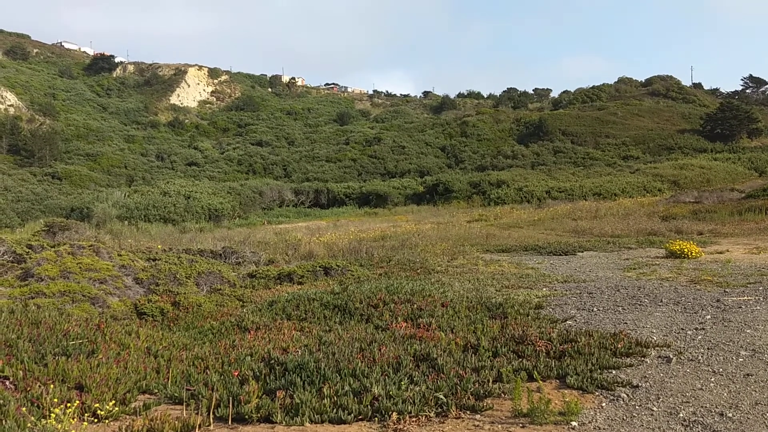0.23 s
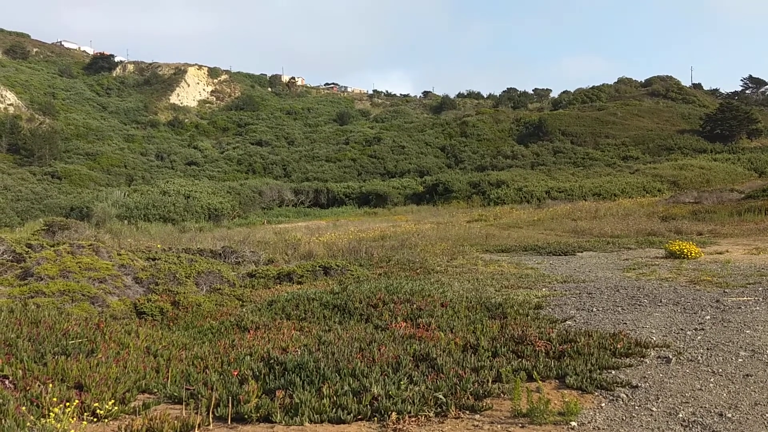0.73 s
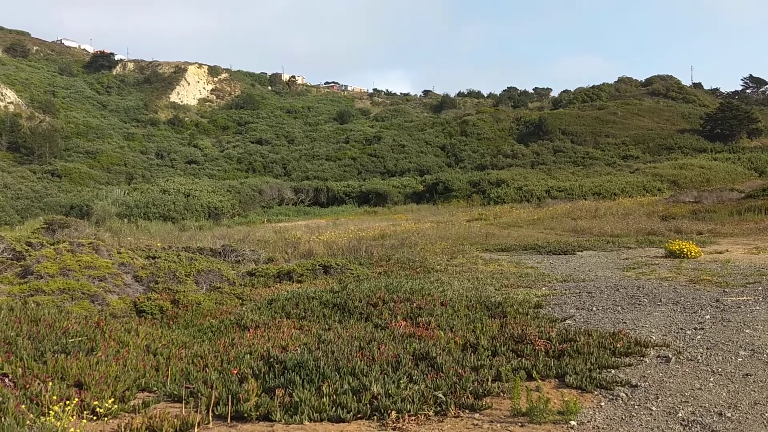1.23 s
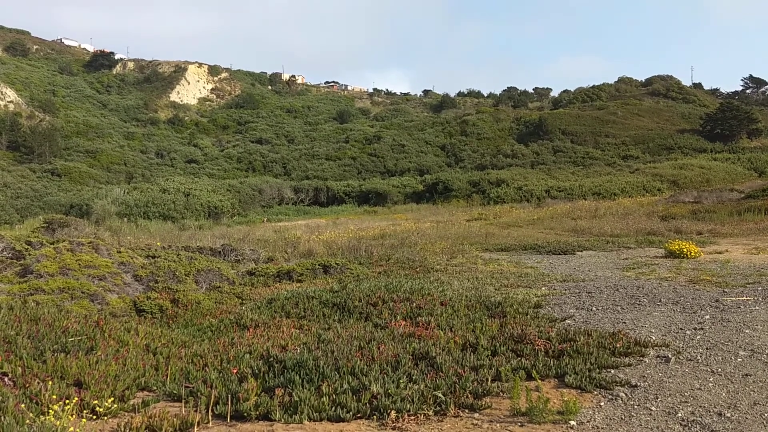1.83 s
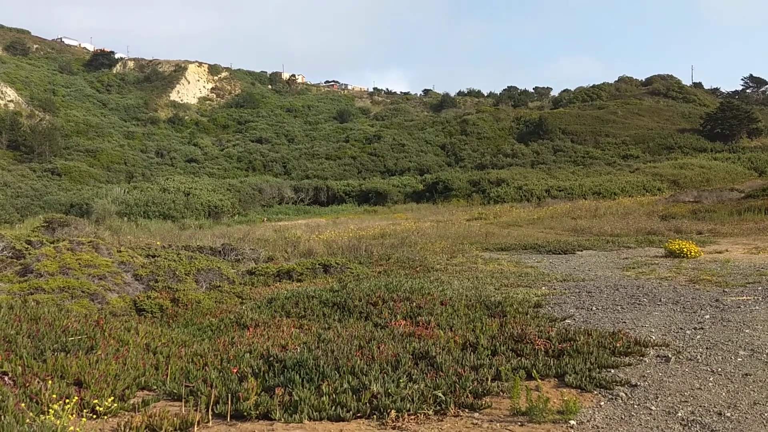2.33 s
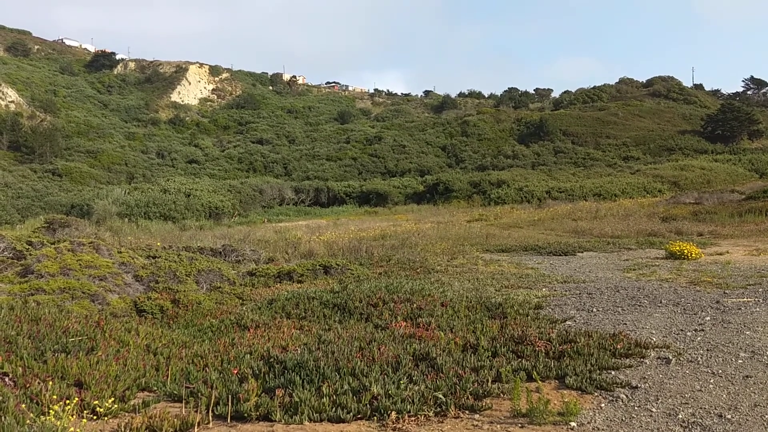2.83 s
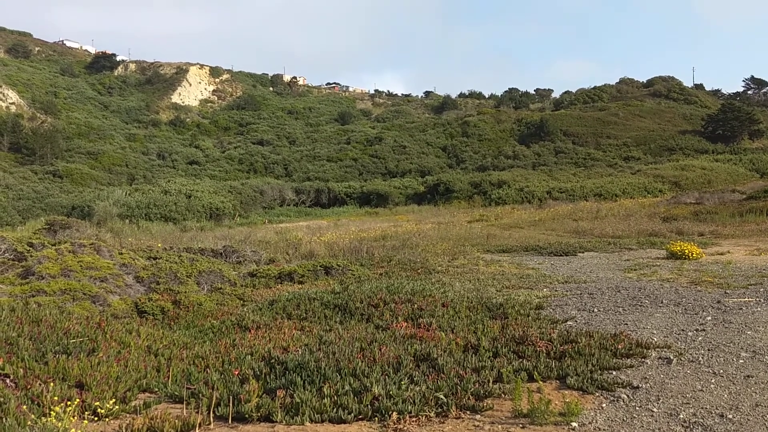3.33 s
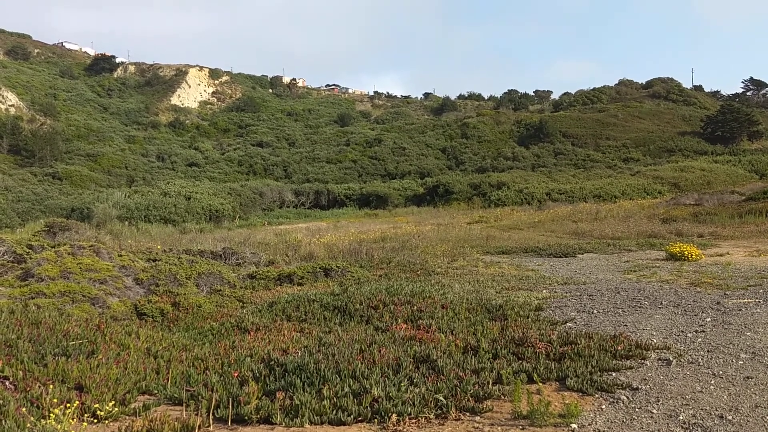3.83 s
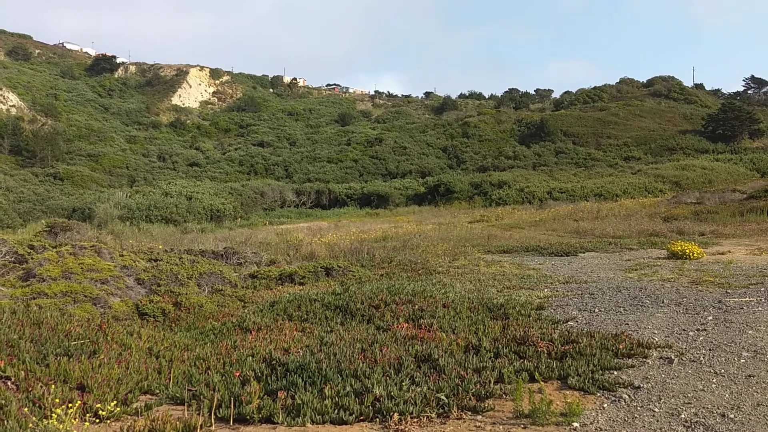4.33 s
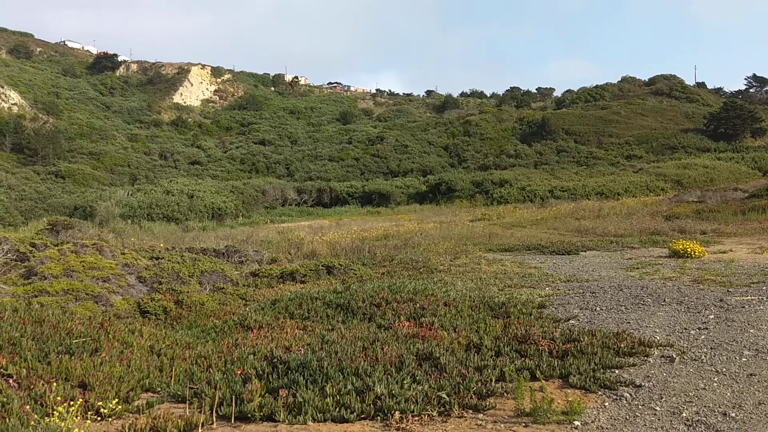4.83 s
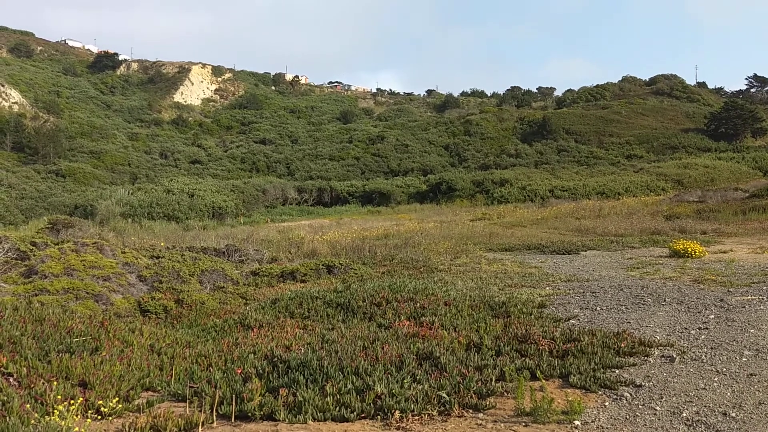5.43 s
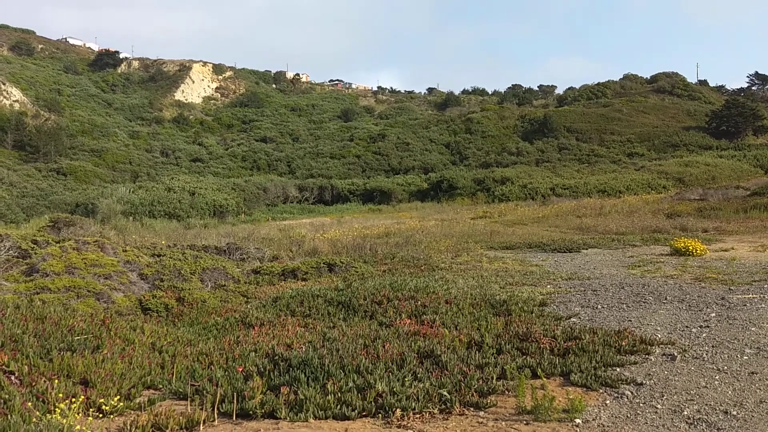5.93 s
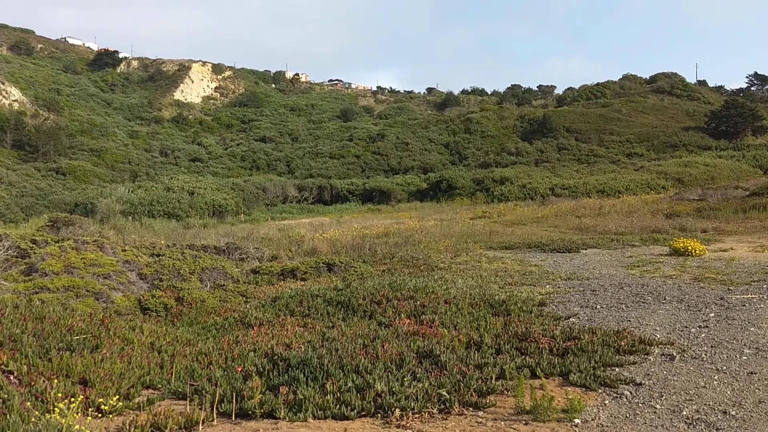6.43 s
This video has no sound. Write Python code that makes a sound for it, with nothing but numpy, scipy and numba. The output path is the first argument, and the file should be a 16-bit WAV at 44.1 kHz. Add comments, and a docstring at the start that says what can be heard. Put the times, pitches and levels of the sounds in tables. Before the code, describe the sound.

A small stereo camera microphone stands in an open valley with faint hiss and a steady distant rush. From 0 s a far coyote howl is already sounding, wavering slowly upward until about 1.4 s, with small yelps beside it and a rising yip near 1.2 s. Weaker hoarse wails overlap from 1.5 s; bright cracking yips burst out at 2.4 and 3.0 s, with more wavering howls between and after, and a last yip around 4 s. The slopes return soft, blurred echoes. Low wind rumble flutters and thumps throughout, mainly left until 3.5 s, then also right, easing after 4.5 s. Very faint bird whistles, dry rustles and a thin high electronic whine hide underneath. From 5.9 s a clear single howl rises slowly, still sounding at the end, with a hoarse yip at 6.5 s. A brief wind knock lands right at 6.24 s; a hard, clicking gust overloads the right at 6.5-6.7 s.

```python
"""Coyotes howl, waver and yip from a far hillside: a few harmonics on gliding pitches, hoarse in places.
The valley throws their voices back, through long delay lines that feed each other.
Gusts buffet the two capsules of a small camera microphone, each mostly on its own: shaped noise that swells,
thumps and clicks. Behind lie a distant rush and hiss of noise, dry rustles, a far bird and a thin whine of sines.
The camera widens its stereo by taking a late copy of each capsule off the other channel."""
import sys
import numpy as np
from scipy import signal
from scipy.fft import rfft, irfft
from scipy.io import wavfile
from scipy.ndimage import uniform_filter1d, map_coordinates
from numba import njit

SR = 44100
rng = np.random.default_rng(int(sys.argv[2]) if len(sys.argv) > 2 else 0)


def transcribe(u):
    """Save the signal u as a 16-bit wav file named by the first command-line argument.

    u: samples, shape (n,) or (channels, n), limited to [-1, 1]; the rate is SR.
    q: integer samples, one column per channel.
    """
    v = np.clip(np.atleast_2d(u).T, -1, 1)
    q = np.round(v * 32767).astype(np.int16)
    wavfile.write(sys.argv[1], SR, q)


N = 294588


def undb(db):
    """Gain of a level in dB."""
    return 10 ** (np.asarray(db) / 20)


def colour(x, points):
    """Shapes white noise by points of (Hz, relative dB per Hz) and keeps its rms."""
    hz, db = np.transpose(points)
    bin_hz = np.fft.rfftfreq(N, 1 / SR)
    gain = undb(np.interp(np.log(bin_hz + 1), np.log(hz), db, -120, -120))
    gain = gain / np.sqrt(np.mean(gain ** 2))
    return irfft(rfft(x) * gain, N)


def walk(rate, size):
    """Random levels held 1 / rate seconds and slewed twice; spread near 1."""
    k = int(SR / rate)
    steps = np.repeat(rng.standard_normal(size // k + 1), k)
    return np.sqrt(2) * uniform_filter1d(uniform_filter1d(steps, k), k)[:size]


def add(track, s, x):
    """Mixes x into track from second s on."""
    i = max(int(s * SR), 0)
    x = x[..., :max(N - i, 0)]
    track[..., i:i + x.shape[-1]] += x


# Hiss of the microphone capsules. Each row: frequency in Hz, relative level in dB per Hz.
CAPSULE_HISS_SPECTRUM = [(500, 10), (2400, -3), (3500, -6), (5000, -9.5), (7000, -13.5), (9000, -18),
                         (12000, -13), (15500, -8.5)]
CAPSULE_HISS_DB = -61.5  # rms


def capsule_hiss():
    """Each capsule makes its own steady noise, unrelated to the other's."""
    return undb(CAPSULE_HISS_DB) * colour(rng.standard_normal((2, N)), CAPSULE_HISS_SPECTRUM)


# Times when the camera's electronics are busy. Each row: start in seconds, length in seconds.
BUSY_TIMES = [(0.068, .075), (0.5, .29), (2.948, 0.49), (5.08, .36)]
# The clock tones that leak meanwhile. Each entry: frequency in Hz.
CLOCK_HZ = [6000, 7000, 8000, 12000, 13000, 14000]
# How loud each clock tone leaks on the right. Each entry: peak level in dB.
CLOCK_DB = [-85, -86, -89, -89, -87, -68]
BLIP_START_S, BLIP_EVERY_S, BLIP_S = 1.025, .32, .075  # short regular blips besides


def camera_whine():
    """Clock tones that leak into the outputs, mostly the right one, while the camera is busy."""
    blips = [(at, BLIP_S) for at in np.arange(BLIP_START_S, N / SR, BLIP_EVERY_S)]
    busy = np.zeros(N)
    for at, length in BUSY_TIMES + blips:
        add(busy, at, np.ones(int(length * SR)))
    busy = np.minimum(busy, 1)  # overlapping times are no louder
    t = np.arange(N) / SR
    tones = sum(undb(db) * np.sin(2 * np.pi * hz * t) for hz, db in zip(CLOCK_HZ, CLOCK_DB))
    left_right = [.35, 1]
    return np.outer(left_right, uniform_filter1d(busy, size=300) * tones)


# Distant rush across the place. Each row: frequency in Hz, relative level in dB per Hz.
RUSH_SPECTRUM = [(150, 17.5), (300, 7), (450, -1), (700, -5.5), (1000, -8.5), (1500, -56.5), (2400, -16),
                 (4000, -55)]
RUSH_DB, RUSH_SHARED = -48, 0.86  # rms; share of the power that both capsules hear alike


def distant_rush():
    """Noise from afar reaches both capsules mostly alike, its level hardly stirring."""
    shared = colour(rng.standard_normal(N), RUSH_SPECTRUM)
    own = colour(rng.standard_normal((2, N)), RUSH_SPECTRUM)
    level = undb(RUSH_DB + 0.13 * walk(0.48, N))
    return level * (np.sqrt(RUSH_SHARED) * shared + np.sqrt(1 - RUSH_SHARED) * own)


# Brief dry rustles near the microphone. Each row: middle in seconds, length in ms (the faded ends
# stretch it 2.5 times), centre in Hz, width in Hz, rms level in dB before the fade.
RUSTLES = [(3.69, 97, 6400, 1460, -69), (3.701, 91, 9900, 5140, -73), (4.87, 170, 7950, 920, -77),
           (4.88, 180, 4500, 889, -74), (6.532, 92, 6500., 1540, -77)]


def rustles():
    """Gritty bursts of band-limited noise that swell and fade."""
    out = np.zeros((2, N))
    for at, ms, hz, width_hz, db in RUSTLES:
        size = int(2.5 * ms * SR / 1000)
        band = signal.butter(2, [hz - width_hz / 2, hz + width_hz / 2], "band", fs=SR, output="sos")
        grit = signal.sosfilt(band, rng.standard_normal((2, size)) * undb(0.97 * walk(270, size)))
        add(out, at - size / SR / 2, undb(db) * np.hanning(size) * grit / grit.std())
    return out


# Faint whistles of a far bird. Each row: start in seconds, length in seconds, start pitch in Hz,
# end pitch in Hz, middle peak level in dB.
BIRD_WHISTLES = [(.42, .1, 3030, 3060, -73), (.6, .28, 2860, 2850, -76), (1.33, .15, 3120, 3100, -73),
                 (1.62, .25, 3060, 3010, -78), (5.46, .06, 3200, 3450, -71), (.01, .03, 3300, 3450, -66),
                 (6.17, .03, 3300, 3450, -77), (5.94, .05, 3250, 3350, -76), (6.35, .03, 3400, 3200, -78)]
# One soft low tone that sinks. The row: start in seconds, length in seconds, start pitch in Hz,
# end pitch in Hz, middle peak level in dB.
SINKING_TONE = (3.95, .4, 242, 190, -41)


def bird_and_low_tone():
    """Pure tones that glide evenly from pitch to pitch while their level flickers."""
    out = np.zeros((2, N))
    for at, length, start_hz, end_hz, db in BIRD_WHISTLES + [SINKING_TONE]:
        size = int(length * SR)
        hz = np.linspace(start_hz, end_hz, size)
        tone = np.sin(2 * np.pi * np.cumsum(hz) / SR)
        add(out, at, undb(db + 3.0 * walk(20, size)) * np.sqrt(np.hanning(size)) * tone)
    return out


# Wind pressure on the capsules between the thumps. Each row: time in seconds, left in dB, right in dB.
GUST_PRESSURE = [(0, -43.5, -42), (.35, -27.5, -34), (0.802, -25, -35.5), (1.5, -27.5, -50),
                 (2.3, -28.5, -40.5), (2.65, -33.5, -28.5), (3.05, -25.5, -32), (3.45, -29.5, -34.5),
                 (3.901, -30.5, -30.5), (4.5, -33, -38), (5.2, -38, -48), (5.9, -44.5, -61),
                 (6.11, -42, -45.5), (6.15, -36, -29.5), (6.24, -53, -22), (6.3, -37, -45),
                 (6.46, -42, -49), (6.512, -22, -7.5), (6.599, -20, -3.5), (6.68, -27, -9)]
# Eddies at set times that thump a capsule. Each row: middle in seconds, capsule (0 left, 1 right),
# level in dB.
SET_EDDIES = [(.457, 0, -18), (.621, 0, -19), (.762, 0, -18), (.864, 1, -25), (.92, 0, -21),
              (1.291, 0, -18), (1.342, 0, -18), (1.698, 0, -19), (1.748, 0, -18), (1.934, 0, -20),
              (2.101, 0, -22), (2.251, 0, -18), (2.391, 0, -21), (2.704, 1, -21), (2.746, 1, -22),
              (3.025, 0, -18), (3.075, 0, -17), (3.125, 0, -22), (3.231, 1, -24), (3.514, 0, -18),
              (3.74, 1, -17), (3.883, 1, -19), (3.891, 0, -20), (4.102, 1, -24), (4.242, 1, -20),
              (4.464, 1, -27), (4.702, 0, -27), (5.041, 1, -31), (6.249, 0, -24)]
# Rumble of the turbulence. Each row: frequency in Hz, relative level in dB per Hz.
RUMBLE_SPECTRUM = [(30, -59.5), (45, -10), (65, 5), (100, 4.5), (145, 2.5), (200, -7.5), (280, -23.5),
                   (400, -32.5), (600, -47.5), (1000, -45.5), (2000, -73), (5000, -105)]
SET_EDDY_S = 0.031
EDDY_COUNT, EDDY_DB, EDDY_S = 33, 7.5, 0.036  # further eddies at random moments, scaled by the gust
EDGE_LOW_HZ, EDGE_HIGH_HZ, EDGE_DB = 298 / 1.46, 298 * 1.35, -9  # sharper edge of a thump


def gusts():
    """Turbulence presses on each capsule: a restless rumble, with thumps where eddies strike."""
    s, *gust_db = np.transpose(GUST_PRESSURE)
    t = np.arange(N) / SR
    push = np.array([undb(np.interp(t, s, db) + 2.8 * walk(13, N)) for db in gust_db])
    thump = np.zeros((2, N))
    for at, side, db in SET_EDDIES:
        add(thump[round(side)], at - SET_EDDY_S / 2, undb(db) * np.hanning(int(SET_EDDY_S * SR)))
    for when, side, strength in rng.random((EDDY_COUNT, 3)):
        i, side = int(when * N), round(side)
        level = push[side, i] * strength * undb(EDDY_DB)
        add(thump[side], i / SR, level * np.hanning(int(EDDY_S * SR)))
    flutter = colour(rng.standard_normal((2, N)), RUMBLE_SPECTRUM)
    # the diaphragm swings about as far as the air pushes it, so the chance swells of noise are evened out
    swing = np.sqrt(uniform_filter1d(uniform_filter1d(flutter ** 2, size=500), size=500))
    flutter = flutter / swing ** .85
    band = signal.butter(2, [EDGE_LOW_HZ, EDGE_HIGH_HZ], "band", fs=SR, output="sos")
    edge = signal.sosfilt(band, flutter)
    edge = edge / edge.std()
    out = (push + thump) * flutter
    out = out + undb(EDGE_DB) * (thump + push ** 2) * edge  # the harder the gust, the sharper
    return out + .09 * out[::-1]  # a share of each eddy also reaches the other capsule


# Sharp edges of wind thumps, and brief clicks where the last gust overloads the recorder. Each row: middle
# in seconds, channel (0 left, 1 right), peak level in dB, length in ms, top frequency in Hz.
EDGES_AND_CLICKS = [(.455, 0, -21, 18, 380), (.616, 0, -22, 14, 380), (1.7, 0, -24, 14, 380),
                    (2.242, 0, -17, 22, 420), (2.386, 0, -24, 12, 380), (2.7, 1, -27, 12, 330),
                    (3.733, 1, -25, 12, 380), (4.509, 1, -37, 3.5, 800), (6.53, 1, -37, 75, 1700),
                    (6.537, 1, -25, 6, 650), (6.549, 1, -20, 10, 550), (6.561, 1, -21, 8, 500),
                    (6.563, 1, -42, 1.6, 3200), (6.589, 1, -17, 5, 750), (6.599, 1, -28, 1.4, 2200),
                    (6.635, 1, -21, 16, 500)]


def thump_edges_and_clicks():
    """Sharp edges of wind thumps and overload clicks: short noise bursts, dulled above a top frequency."""
    out = np.zeros((2, N))
    for at, side, db, ms, top_hz in EDGES_AND_CLICKS:
        size = int(ms * SR / 1000)
        burst = np.pad(np.hanning(size) * rng.standard_normal(size), (0, 400))  # room to ring out
        burst = signal.sosfilt(signal.butter(6, top_hz, fs=SR, output="sos"), burst)
        add(out[round(side)], at - ms / 2000, undb(db) * burst / np.abs(burst).max())
    return out


VALLEY_T60_S, VALLEY_DAMP, VALLEY_DB = 1.17, 0.091, -15  # decay by 60 dB before the damping (0-1 a round)
ECHO_DRIFT_MS, ECHO_DRIFT_PER_S = 0.28, 60  # spread of the wobble, new values a second


@njit
def slopes(x, lags, gain, damp):
    """Eight long delay lines that feed each other, duller on every round."""
    line, soft, out = np.zeros((8, 16384)), np.zeros(8), np.zeros((2, len(x)))
    for i in range(len(x)):
        total = 0.
        for k in range(8):
            soft[k] += (1 - damp) * (gain[k] * line[k, (i - lags[k]) & 16383] - soft[k])
            total += soft[k]
            out[k % 2, i] += soft[k]
        for k in range(8):
            line[k, i & 16383] = x[i] + soft[k] - total / 4
    return out


def valley(pack):
    """Moving air wobbles the long path to the slopes and blurs the voices that come back."""
    lags = rng.integers(1500, 9000, 8)  # samples
    path = np.arange(N) - ECHO_DRIFT_MS * SR / 1000 * walk(ECHO_DRIFT_PER_S, N)
    sent = map_coordinates(pack[0], [path], order=1) + 1e-18  # never so near zero that the loop slows
    echo = slopes(sent, lags, undb(-60 * lags / SR / VALLEY_T60_S), VALLEY_DAMP)
    return undb(VALLEY_DB) * (echo + 0.082 * echo[::-1])


# Colour of all the voices, hollow near 2150 Hz, where the stereo widening also thins them.
# Each row: frequency in Hz, gain in dB.
VOICE_COLOUR = [(500, 0), (1000, 0), (1500, 1), (1800, -2), (2150, -12), (2600, -1), (3000, 0), (3600, -4)]
HALF_SHARE = 1.16  # a throat that cracks makes every second cycle weaker


def voice(t, hz, harmonics_db, hoarse, lead_us):
    """A few harmonics on a gliding pitch; a hoarse throat shakes pitch and strength from cycle to cycle."""
    hz = hz * (1 + .003 * walk(22, len(t)) + .065 * hoarse * walk(400, len(t)))
    lead = np.outer([0, lead_us], hz) / 10 ** 6  # cycles by which the right capsule hears it earlier
    phase = 2 * np.pi * (np.cumsum(hz) / SR + lead)
    # ends fade over 15 ms, except where a call is already sounding at the start or still is at the end
    since_start = t - t[0] + (t[0] == 0)
    until_end = t[-1] - t + (t[-1] > 6.6)
    fade = np.clip(np.minimum(since_start, until_end) / .015, 0, 1)
    out = 0
    for k, db in enumerate(harmonics_db, start=1):
        # moving air over the long path makes each harmonic shimmer, a little differently at each capsule
        shimmer_db = .6 * walk(25, len(t)) + 6 * hoarse * walk(500, len(t))
        apart_db = 1.4 * np.outer([1, -1], walk(25.27, len(t)))
        colour_db = np.interp(k * hz, *np.transpose(VOICE_COLOUR))
        out = out + undb(db + colour_db + shimmer_db + apart_db) * np.sin(k * phase)
    crack = 1 + HALF_SHARE * hoarse ** 2 * np.cos(phase / 2)
    return np.sqrt(2) * fade * out * crack  # the root turns rms levels into peaks


# How far each overtone follows the opening of the mouth. Each entry: factor on the mouth's dB,
# from the second harmonic up.
MOUTH_SHARE = [0.97, 0.54, 1.07, 1.84]
RISING_DB = 1  # a voice is louder while it climbs and softer while it sinks, per octave a second


def howl(throat, turns):
    """A long call that glides roundly from turn to turn while the mouth colours its overtones."""
    lead_us, *overtones_db, hoarse = throat
    s, *columns = np.transpose(turns)
    t = np.arange(s[0], s[-1], 1 / SR)
    hz, db, mouth_db = (np.interp(t, s, c) for c in columns)
    hz = uniform_filter1d(uniform_filter1d(hz, size=380, mode="nearest"), size=380, mode="nearest")
    octaves_per_s = np.gradient(np.log2(hz)) * SR
    db = db + RISING_DB * np.clip(octaves_per_s, -4, 4)
    overtones = [db + share * mouth_db + o for o, share in zip(overtones_db, MOUTH_SHARE)]
    return voice(t, hz, [db] + overtones, hoarse, lead_us)


def cry(throat, turns):
    """A short yelp or yip that moves in quick steps and turns hoarse where it cracks."""
    lead_us, *harmonics_db = throat
    s, *columns = np.transpose(turns)
    t = np.arange(s[0], s[-1], 1 / SR)
    hz, db, hoarse = (np.interp(t, s, c) for c in columns)
    hz = uniform_filter1d(hz, size=400, mode="nearest")
    return voice(t, hz, [db + h for h in harmonics_db], np.clip(hoarse, 0, 1), lead_us)


# Long calls from the far hillside. Each row: a throat (right capsule earlier by microseconds, second and
# higher harmonics in dB against the first, hoarseness 0-1), then the turns of the voice. Each turn: time in
# seconds, pitch in Hz, level of the first harmonic in dB, mouth opening in dB shared out to the overtones.
HOWLS = [ ((143, -17, -14, -33, 0.0076), [(0, 608, -43.5, 0), (.025, 608, -36, -11), (.055, 604, -40, -20),
         (.07, 650, -44, 2), (.09, 622, -35.5, -10), (.115, 628, -39, -13), (.158, 651, -39, -4),
         (.234, 653, -40.5, -2), (.276, 673, -40.5, -0.5), (.328, 686, -41, -4), (.38, 681, -40.5, -4.5),
         (.418, 696, -41.5, 1), (.442, 709, -44, 5), (.576, 706, -41, -0.5), (.622, 728, -40.5, -5),
         (.665, 728, -42.5, 4), (.71, 726, -40, -3), (.74, 731, -38, -1), (.775, 739, -39.5, 1),
         (.83, 737, -43.5, 3), (.925, 740, -41, 2.5), (.955, 749, -43, 5.5), (1.1, 747, -41.5, 2),
         (1.18, 737, -44.5, 3), (1.22, 738, -42, 6), (1.3, 737, -50, 10.5), (1.39, 737, -42.5, -6),
         (1.44, 738, -50.5, 4), (1.455, 735, -62, 17), (1.48, 560, -47.5, 25)]),
         ((133, -7.5, -9.5, -29, 0.286), [(1.33, 960, -62, -30), (1.37, 970, -55, -35),
         (1.44, 960, -57, -32), (1.5, 900, -70, -12), (1.528, 815, -66, 19), (1.56, 725, -66, 15),
         (1.595, 670, -69, 14), (1.62, 578, -51.5, -3), (1.7, 570, -58, -15), (1.84, 830, -58, 2),
         (1.91, 715, -63, 7.5), (2.034, 820, -56, 1), (2.108, 752, -57, 1.5), (2.222, 925, -60, 6.5),
         (2.316, 708, -63, 16), (2.36, 735, -66, 11), (2.41, 860, -61, 12)]), ((33, -16, -7, -39, 0),
         [(2.32, 526, -60.5, 0), (2.55, 699, -52.5, -3), (2.7, 726.3, -55, -2), (2.85, 766.3, -60, 15),
         (3.2, 769, -53.5, 1), (3.42, 783, -57.5, -6)]), ((108, -0.5, 0, -27, 0.36), [(2.64, 740, -54, -4),
         (2.72, 670, -73.5, 7), (2.8, 750, -54.5, -7), (2.85, 780, -58, -10), (2.9, 750, -68, 7),
         (2.96, 800, -67, -2)]), ((105, -8, -3.5, -33, 0.2686), [(3.15, 775, -64, 17),
         (3.26, 685, -57.5, 0.5), (3.37, 752, -52.5, -0.5), (3.454, 730, -55.5, 5), (3.564, 836, -56, -5),
         (3.658, 720, -56.5, 9), (3.712, 760, -50, -11), (3.76, 865, -63, 7), (3.88, 640, -61, 3),
         (3.95, 790, -54.5, -1)]), ((-61, -10, -8.5, -11.5, -44, 0.0162), [(5.77, 370, -97, 11),
         (5.82, 430, -92, 14), (5.87, 510, -78, 28), (5.92, 515, -65, 20), (5.965, 550.3, -53, 11.5),
         (6.0, 520.6, -48.5, 5.5), (6.08, 512.6, -51.5, 3.5), (6.15, 521, -54, 5), (6.24, 574, -50.5, 3),
         (6.3, 580, -48.5, 2.5), (6.43, 580, -46.5, 2), (6.53, 594, -47.5, 1), (6.6, 608, -53.5, -5),
         (6.68, 630, -56.5, -3)]), ]
# Yelps and yips from the same hillside. Each row: a throat (right capsule earlier by microseconds, four
# harmonics in dB), then the turns. Each turn: time in seconds, pitch in Hz, level in dB added to every
# harmonic, hoarseness 0-1.
CRIES = [ ((40, -10, -1.5, -12, -22), [(0, 651, -51, 0.24), (.05, 655, -57, 0.38), (.075, 663, -53.5, 0.68),
         (.1, 623, -62, .7)]), ((26, -18, 3, -23, -33), [(.385, 510, -70, .2), (.415, 645, -60, .2),
         (.43, 670, -67, .3)]), ((30, -18, 1, -20, -30), [(.425, 833, -69, 0.2), (.445, 805, -60, 0),
         (.485, 805, -64, .2)]), ((18, -16, 0, -14, -30), [(.44, 490, -57, 0.1), (.475, 488, -58, 0.2),
         (.515, 590, -60, 0.4)]), ((24, -16, 4, -2, -31), [(.5, 775, -65, 0.1), (.55, 857, -64.5, 0.42),
         (.6, 950, -69, 0.4)]), ((101, -25, -1, -20, -28), [(.595, 495, -61, 0.15), (.63, 598, -53, 0.2),
         (.68, 650, -53, 0.18), (.73, 693, -49.5, 0.24), (.79, 714, -58.5, .3)]), ((100, -18, 1, -20, -30),
         [(1.07, 470, -69, .2), (1.11, 524, -66, .2), (1.155, 603, -60, .25)]), ((140, -1.5, -6.5, -8, -34),
         [(1.155, 520, -54, 0.2), (1.19, 675, -56, 0.14), (1.22, 775, -51, 0.25), (1.26, 870, -48, 0.1),
         (1.29, 923, -57, 0), (1.31, 946, -49, 0.2), (1.35, 965, -59, 0.1)]), ((140, -4.5, -17, -12, -34),
         [(2.365, 755, -54, 0), (2.4, 863, -48, 0.25), (2.42, 895, -48, 0.23), (2.44, 962, -47, 0.37),
         (2.455, 1120, -52, 0.8), (2.48, 1100, -54, 0.8), (2.5, 1044, -49, 0.74), (2.54, 1010, -53, 0.4)]),
         ((128, -18, -0.5, -3, -12.5), [(2.405, 684, -52, 0.02), (2.43, 702, -52.5, 0.1),
         (2.445, 741, -45, 0.3), (2.457, 824, -48.5, .4), (2.483, 823, -45, 0.47), (2.503, 600, -48, 0.9)]),
         ((110, -1, -22, -14, -32), [(2.92, 770, -54, 0.2), (2.945, 842, -44.5, 0.2), (2.97, 878, -54, 0.3),
         (2.99, 928, -45, .2), (3.01, 992, -49, 0.6), (3.04, 1066, -45.5, 0.46), (3.06, 1060, -53, 0.3),
         (3.1, 970, -56, .2)]), ((109, -19, -1.5, -3, -18), [(2.95, 673, -55, 0), (2.98, 694, -49, 0.25),
         (3.0, 722, -45.5, .25), (3.02, 800, -48.5, .5), (3.035, 800, -50, 0.66), (3.055, 795, -56.5, 0.7),
         (3.085, 700, -62, .8)]), ((96, 0, -18, -7.5, -31), [(3.915, 736, -47, .1), (3.95, 805, -43, 0.24),
         (3.965, 900, -51, 0.6), (3.98, 930, -52, 0.42), (4.0, 945, -46.5, 0.25), (4.045, 947, -53, 0.24),
         (4.065, 935, -63, 0.6), (4.12, 915, -65, 0.9)]), ((92, -17, -10, -20, 0), [(3.915, 730, -70, .3),
         (3.94, 765, -69, .3), (3.955, 740, -76, 0.2), (3.975, 765, -67, .3), (4.01, 750, -73, .4)]),
         ((18, -18, 0.5, -20, -32), [(6.03, 720, -66, .05), (6.06, 705, -62, 0.14), (6.12, 705, -65, 0.1),
         (6.15, 720, -68, .05)]), ((18, -7, -6, -5, -24), [(6.49, 800, -58, 0.5), (6.525, 897, -52, 0.47),
         (6.565, 816, -51, 0.66)]), ]


def coyotes():
    """All calls across the valley, direct and back from the slopes."""
    pack = np.zeros((2, N))
    for throat, turns in HOWLS:
        add(pack, turns[0][0], howl(throat, turns))
    for throat, turns in CRIES:
        add(pack, turns[0][0], cry(throat, turns))
    return pack + valley(pack)


def scene():
    """Sound at the left and right capsule, with hiss and the overload clicks."""
    background = capsule_hiss() + distant_rush() + rustles() + bird_and_low_tone()
    wind = gusts() + thump_edges_and_clicks()
    return background + wind + coyotes()


WIDEN, WIDEN_LAG = .9, 20  # share of the other channel taken off, samples late
GAIN_KNEE, GAIN_S = .07, .07  # average level where the gain starts to give way, averaging time in seconds
NOISE_FLOOR_DB, PEAK_LIMIT, TOP_HZ = -92.5, .8, 15750


def record(dry):
    """Camera: stereo widening, whine, gain that yields to loud sound, a faint steady noise floor, rounded peaks
    and a top cut."""
    late = np.pad(dry[::-1], ((0, 0), (WIDEN_LAG, 0)))[:, :N]
    wide = dry - WIDEN * late + camera_whine()
    hold = 1 - np.exp(-1 / (GAIN_S * SR))
    loud = signal.lfilter([hold], [1, hold - 1], np.abs(wide).max(axis=0))
    wide = wide * np.minimum(1, (GAIN_KNEE / (loud + 1e-9)) ** .3)
    wide = wide + undb(NOISE_FLOOR_DB) * rng.standard_normal((2, N))
    wide = PEAK_LIMIT * np.tanh(wide / PEAK_LIMIT)
    return signal.sosfilt(signal.ellip(10, .2, 80, TOP_HZ, fs=SR, output="sos"), wide)


dry = scene()
out = record(dry)
transcribe(out)
```